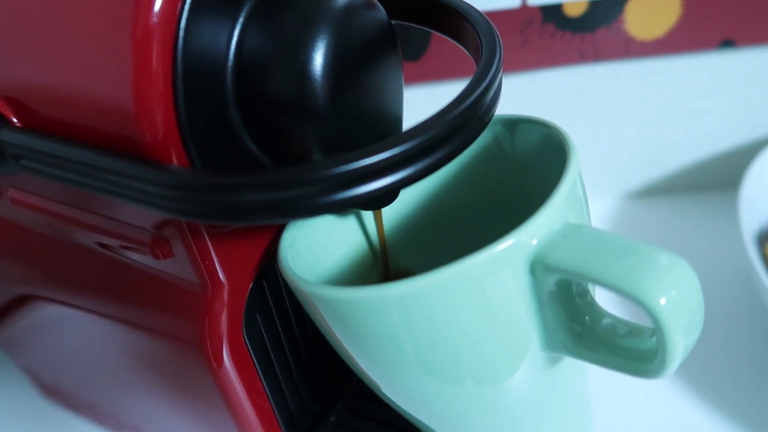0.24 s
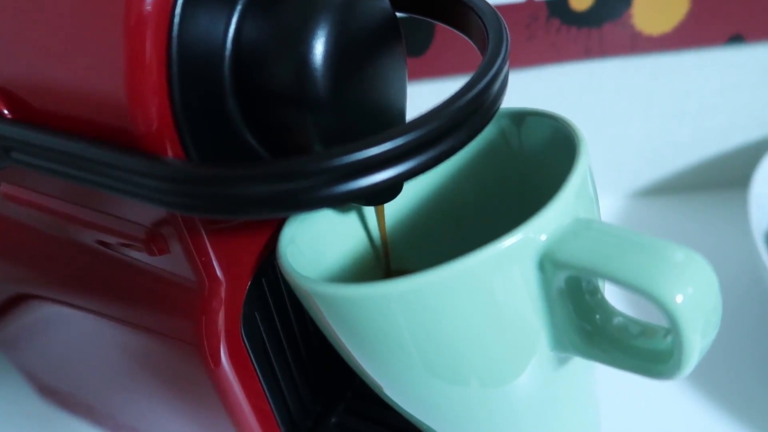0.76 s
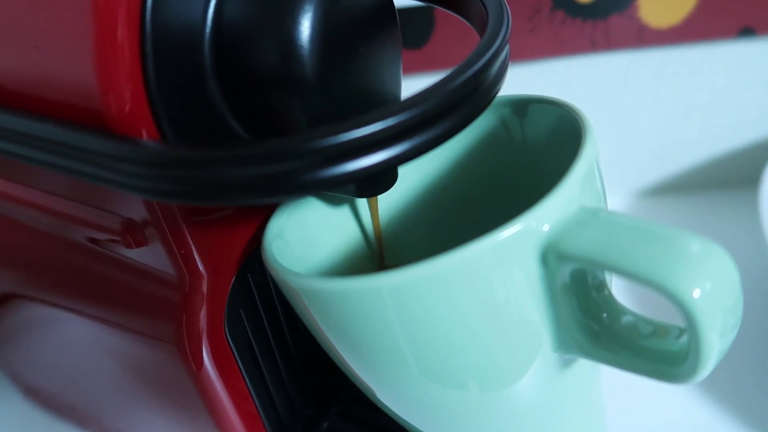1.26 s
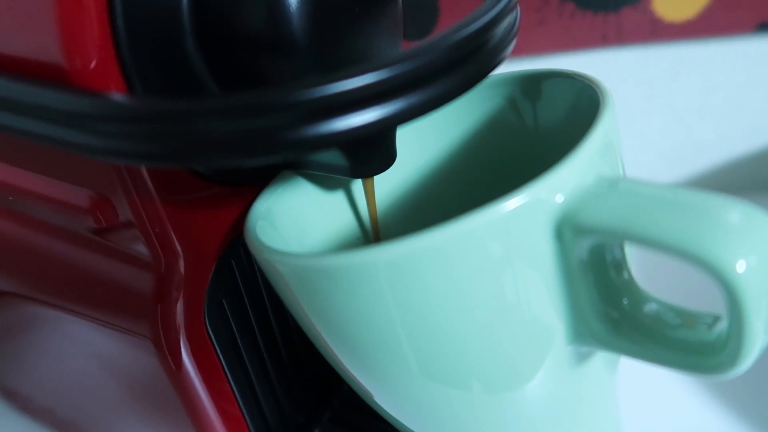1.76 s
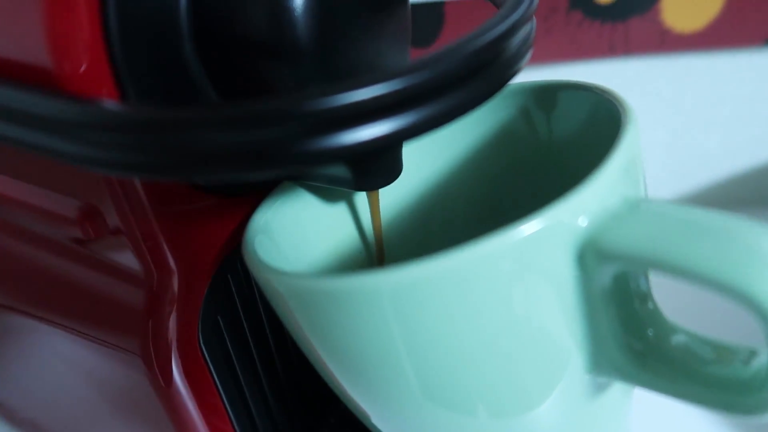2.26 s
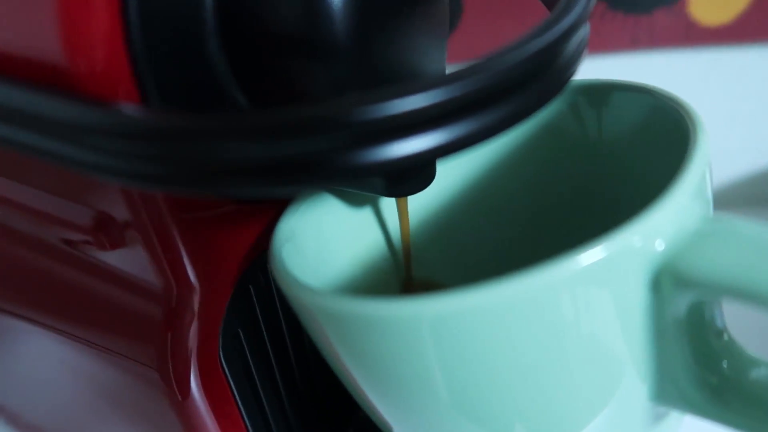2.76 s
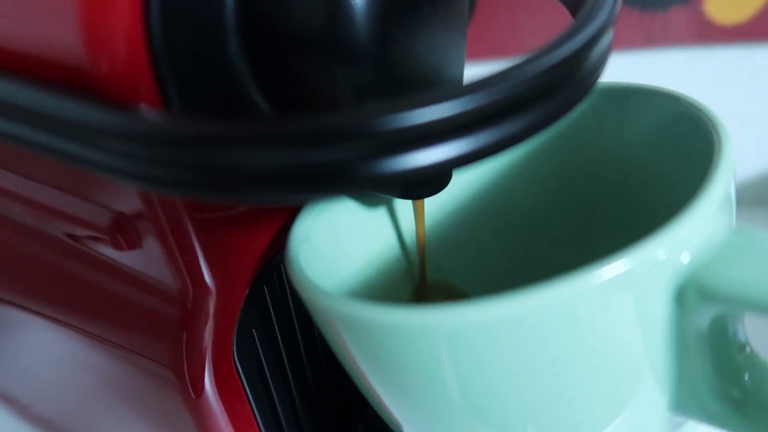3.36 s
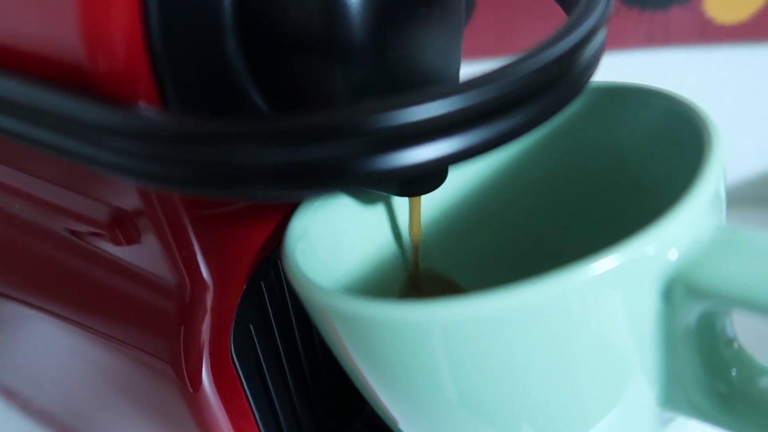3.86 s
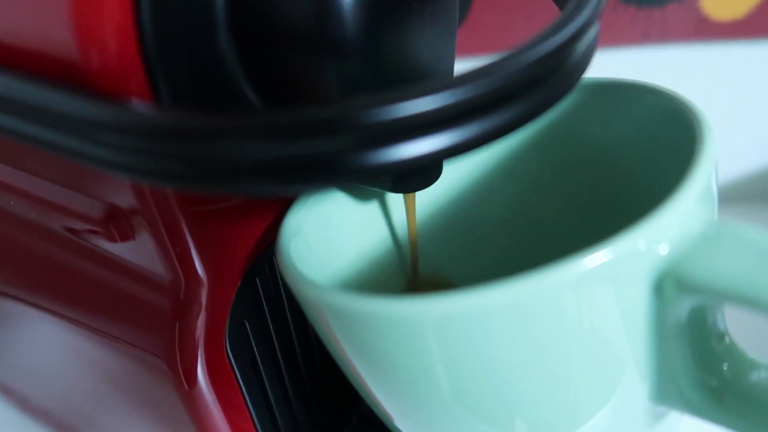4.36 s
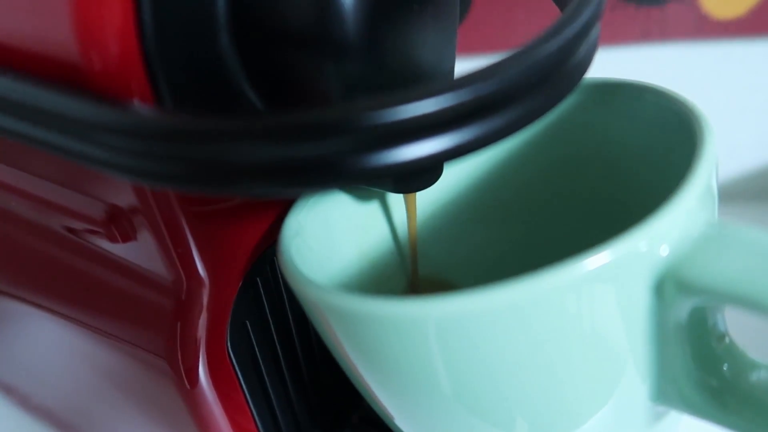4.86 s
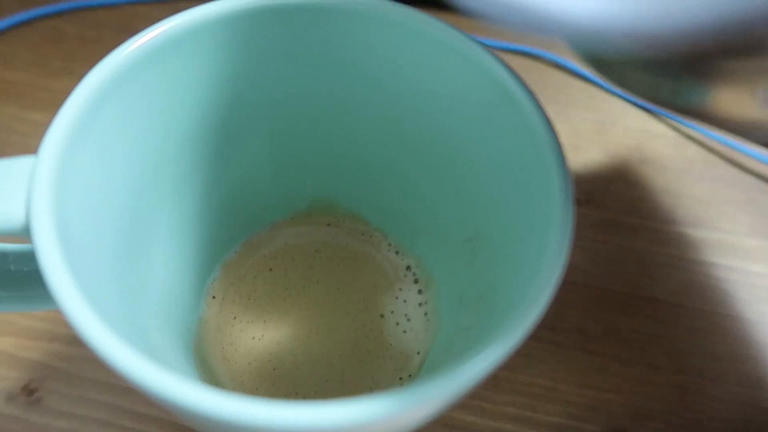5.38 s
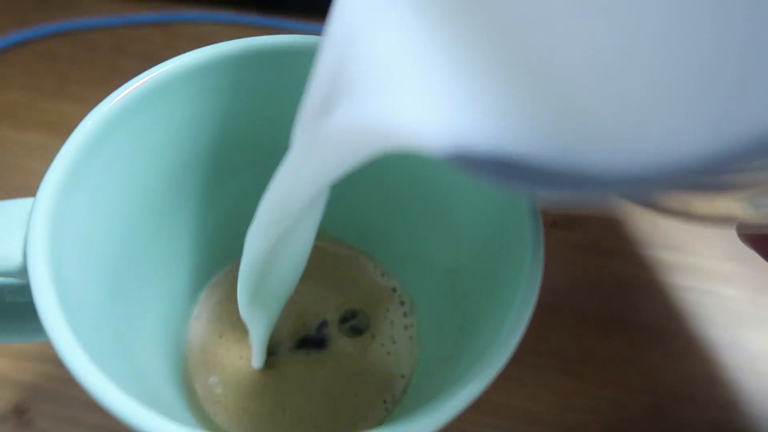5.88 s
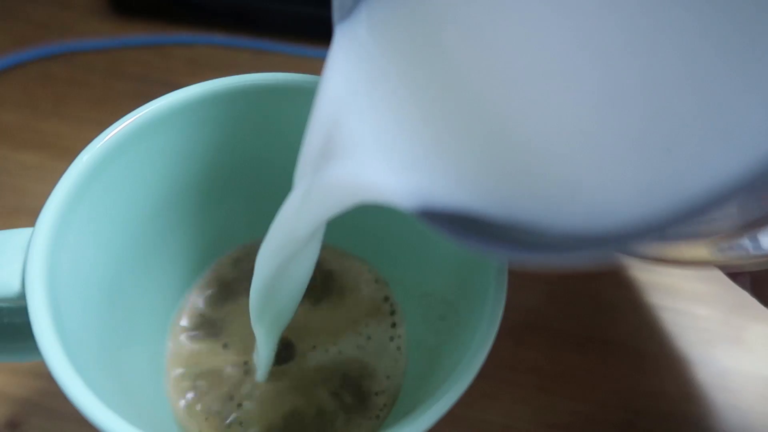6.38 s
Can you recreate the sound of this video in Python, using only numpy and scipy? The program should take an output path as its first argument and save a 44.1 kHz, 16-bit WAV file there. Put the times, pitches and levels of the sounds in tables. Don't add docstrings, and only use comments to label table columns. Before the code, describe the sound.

Close handheld stereo microphone: a steady, rough electric hum strongest around 200 hertz, with rapid piston knocking, rushing water and thin high spurts. Sputters from air pockets come early, and ceramic rattling comes and goes in short runs. Then a hard cut to much quieter milk pouring over low room rumble and a faint refrigerator drone: a sharp plop, short gurgle, light splashes and scattered bubbly blips.

```python
import sys
import numpy as np
from scipy import signal
from scipy.fft import rfft, irfft
from scipy.io import wavfile

SR = 44100
rng = np.random.default_rng(int(sys.argv[2]) if len(sys.argv) > 2 else 0)


def natural_amplitude(level_db):
    exponent = np.asarray(level_db, float) / 20
    return 10 ** exponent


def bounce(signal):
    frames = np.transpose(np.atleast_2d(signal))
    limited = np.clip(frames, -1, 1)
    pcm = np.round(limited * 32767).astype(np.int16)
    wavfile.write(sys.argv[1], SR, pcm)


N = 292383
TIME = np.arange(N) / SR
BINS_HZ = np.maximum(np.arange(N // 2 + 1) * SR / N, 1)
STROKE_HZ, CUT_S = 50.018, 5.4505

# time_s, pressure_0_to_1
PRESSURE = [
    (0, 0.04),
    (.5, 0.02),
    (1, 0.1),
    (1.5, 0.26),
    (2.4, 0.58),
    (2.9, 0.75),
    (3.3, .95),
    (4, 1),
    (5.45, 0.97),
]
# stroke_multiple, level_db
HUM_AIRY = [(1, -26), (2, -6), (3, -21), (4, 1), (5, -24), (6, -22), (7, -19.5), (8, -37.5), (9, -29),
            (10, -13.5), (11, -22.5), (12, -23), (13, -28.5), (14, -21.5), (15, -20), (16, -41), (17, -41),
            (18, -17), (19, -21), (20, -17.5), (21, -42), (22, -41), (23, -23), (24, -34), (25, -33)]
# stroke_multiple, level_db
HUM_RISING = [(1, -27.5), (2, -8.5), (3, -18.5), (4, 1), (5, -21.5), (6, -20.5), (7, -25), (8, -33),
              (9, -21.5), (10, -22), (11, -20.5), (12, -37), (13, -31), (14, -24), (15, -24), (16, -43),
              (17, -26), (18, -19), (19, -19), (20, -21.5), (21, -52), (22, -41), (23, -33), (24, -20),
              (25, -22.5)]
# stroke_multiple, level_db
HUM_FULL = [(1, -27), (2, -9.5), (3, -20.5), (4, 0.5), (5, -20), (6, -20), (7, -28), (8, -29), (9, -19),
            (10, -20), (11, -23), (12, -29.5), (13, -32.5), (14, -33), (15, -44.5), (16, -43), (17, -43),
            (18, -32), (19, -22.5), (20, -24), (21, -57), (22, -46), (23, -28.5), (24, -37), (25, -32)]
# pitch_hz, t60_s, airy_db, rising_db, full_db
HOUSING_MODES = [(1376, 0.24, -43.5, -49, -54), (1450, 0.2, -51, -52, -47), (1557, 0.067, -55, -52.5, -54),
                 (1616, 0.09, -48, -57, -58), (1696, 0.31, -43, -38, -53), (1748, 0.72, -40, -46, -44),
                 (1824, 0.077, -37.5, -42.5, -43.5), (2033, 0.26, -40, -47, -46.5),
                 (2133, 0.057, -49, -50.5, -42), (2242, 0.04, -48, -47.5, -43.5),
                 (2580, 0.099, -58, -58, -55), (2950, 0.16, -51, -53, -69)]
# frequency_hz, level_db_per_hz
RUSH_AIRY = [(25, -19), (75, -5.5), (125, 0), (170, -8), (300, -8), (400, -5), (600, -5), (950, -2),
             (1300, -6.5), (1600, -1), (2100, -4), (2500, -13.5), (4500, -25), (8000, -62)]
# frequency_hz, level_db_per_hz
RUSH_FULL = [(25, -11), (75, 1), (125, -1.5), (170, -6), (300, -8.5), (400, 1.5), (600, -2.5), (950, 0),
             (1100, -5.5), (1600, -3.5), (2200, -3.5), (2500, -9), (4500, -22.5), (8000, -41)]
# frequency_hz, level_db_per_hz
JET_SPECTRUM = [(1470, -32), (2500, 0.5), (3000, -1.5), (3320, -4), (3780, -6.5), (5670, -8.5), (6280, -17),
                (7260, -10.5), (9420, -21.5), (11200, -19.5), (12700, -20.5), (13200, -24), (14100, -37)]
# time_s, peak_db
SLAPS = [(1.326, -26), (1.366, -23), (1.5074, -19.5), (1.6458, -17), (1.6872, -30), (1.8274, -19),
         (1.9467, -24), (2.009, -33.5), (2.1063, -20), (2.1861, -26), (2.291, -25), (2.7059, -15.5),
         (2.7857, -16), (2.889, -37), (2.9286, -33), (4.0045, -17)]
RATTLE_HZ = [2970, 2850, 2930]
# start_s, length_s, level_db
LOOSE_RUNS = [(0.03, 0.3, -42), (.47, 0.31, -48), (0.921, 0.36, -40.5), (1.302, 0.25, -43.5),
              (1.72, 0.27, -42.5), (2.12, 0.25, -42), (2.45, 0.21, -39.5), (3.11, .85, -41.5),
              (3.998, 0.091, -42), (4.22, 0.39, -43), (4.737, .24, -42), (5.08, 0.18, -44.5)]
# frequency_hz, side_minus_mid_db
WIDTH_BREW = [(60, -60), (110, -51), (200, -30.5), (370, -23.5), (670, -19), (1230, -15.5), (2240, -13.5),
              (4100, -7), (7490, -1.5), (13700, 5.5)]
# time_s, level_db
CHURN = [
    (5.685, -63),
    (5.693, -38),
    (5.81, -43.5),
    (5.9, -58),
    (6.0, -60),
    (6.05, -46.5),
    (6.3, -65),
    (6.5, -50.5),
    (6.63, -58),
]
# pitch_hz, width_hz, level_db
GURGLE = [
    (345, 37, 2),
    (700, 130, -2),
]
# pitch_hz, level_db, t60_s
PLOP_RINGS = [
    (697, -10, 0.063),
    (1110, -17, 0.084),
    (350, -32, 0.14),
    (173, -33, .35),
]
# time_s, peak_db, pitch_hz
BUBBLES = [(5.633, -36, 1130), (5.701, -21, 626), (5.722, -19, 692), (5.734, -32, 710), (5.75, -33, 1090),
           (5.756, -22, 674), (5.787, -27.5, 1250), (5.816, -38, 1310), (5.837, -40, 1110),
           (5.859, -38, 700), (6.025, -37, 1110), (6.045, -33.5, 1150), (6.079, -48, 1250),
           (6.097, -46, 1080), (6.117, -34, 1230), (6.167, -48, 1240), (6.191, -39, 1180), (6.2, -36, 1110),
           (6.265, -43, 1129), (6.351, -46, 1110), (6.372, -46, 1110), (6.393, -34, 1070),
           (6.442, -42, 1110), (6.47, -31, 1110), (6.484, -37, 1100), (6.501, -35, 1100),
           (6.511, -38, 1100), (6.534, -25.5, 1110), (6.546, -34, 1140), (6.614, -45, 945)]
# time_s, peak_db, centre_hz
SNAPS = [
    (5.633, -57, 9000),
    (5.656, -62, 9000),
    (5.734, -45, 2700),
    (5.783, -52, 8000),
    (5.793, -46, 2900),
    (5.838, -49, 2600),
    (6.191, -48, 2950),
    (6.265, -54, 3100),
    (6.534, -51, 5000),
]
# pitch_hz, level_db, t60_s
DROP_RINGS = [
    (720, -3.5, 0.028),
    (1080, 0.5, .03),
    (1144, -1.5, 0.035),
    (1280, -2.5, 0.02),
    (1450, -4.5, 0.015),
    (2000, -7, 0.013),
    (2600, -8, 0.017),
    (3050, -6.5, 0.013),
    (3300, -6, .01),
]
# frequency_hz, level_db_per_hz
KITCHEN_SPECTRUM = [(15, -37), (25, -9), (54, -7), (92, -24), (129, -5.5), (214, -13.5), (245, -11),
                    (294, -19), (1880, -33), (2100, -33.5), (2590, -39), (3760, -38.5), (14100, -54.5)]
# frequency_hz, side_minus_mid_db
WIDTH_POUR = [(60, -20), (110, -25), (200, -12), (370, -6.5), (670, -10.5), (1230, -13.5), (2240, -3),
              (4100, -3), (7490, 0), (13700, 2)]


def rms_one(x):
    return x / np.sqrt(np.mean(x ** 2) + 1e-20)


def curve(rows):
    time_s, value = np.transpose(rows)
    return np.interp(TIME, time_s, value)


def by_pressure(levels, pressure):
    return np.interp(pressure[::64], [0, .5, 1], levels).repeat(64)[:N]


def coloured(x, spectrum):
    hz, db = np.transpose(spectrum)
    return irfft(rfft(x) * natural_amplitude(np.interp(np.log(BINS_HZ), np.log(hz), db)), N)


def bandpass(x, order, low_hz, high_hz):
    return signal.sosfilt(signal.butter(order, [low_hz, high_hz], "band", fs=SR, output="sos"), x)


def drift(rate_hz):
    return 1.22 * np.interp(TIME, np.arange(600) / (2 * rate_hz), rng.standard_normal(600))


def ring(clicks, hz, t60_s):
    r, w = natural_amplitude(-60 / (t60_s * SR)), 2 * np.pi * hz / SR
    return signal.lfilter([0, np.sin(w)], [1, -2 * r * np.cos(w), r * r], clicks + 1e-18)


def narrow_noise(hz, width_hz):
    lowpass = signal.butter(2, width_hz / 2, fs=SR / 16, output="sos")
    re, im = signal.sosfilt(lowpass, rng.standard_normal((2, N // 16 + 2)))
    slow = np.interp(np.arange(N) / 16, np.arange(N // 16 + 2), re + 1j * im)
    carrier = np.exp(2j * np.pi * np.cumsum(hz + 0 * TIME) / SR)
    return rms_one(np.real(slow * carrier))


def clicks_at(seconds, sizes):
    out = np.full(N, 1e-18)
    np.add.at(out, np.clip((np.asarray(seconds) * SR).astype(int), 0, N - 1), sizes)
    return out


def scattered(x, decay_s):
    t = np.arange(int(5 * decay_s * SR)) / SR
    echoes = rms_one(rng.standard_normal(len(t)) * np.exp(-t / decay_s)) / np.sqrt(len(t))
    return signal.oaconvolve(x, echoes)[:N]


def stroke_times(phase):
    return (np.arange(int(CUT_S * STROKE_HZ) + 1) + phase) / STROKE_HZ


def hum(level_db, pressure, rush_db):
    out = natural_amplitude(-50.5) * np.cos(2 * np.pi * 49.32 * TIME - 1.6)
    strongest_db = dict(HUM_FULL)[4]
    for (k, airy_db), (_, rising_db), (_, full_db) in zip(HUM_AIRY, HUM_RISING, HUM_FULL):
        high = k > 4
        db = level_db + 3 + by_pressure([airy_db, rising_db, full_db], pressure) - strongest_db
        db = db + (0.26 * high + 0.076 * k) * drift(5.0)
        db = db + .5 * (rush_db + 30.5) * high
        lag = (rng.uniform(0, 2 * np.pi) + .7 * k * k) * high + 0.011 * k * drift(7.0)
        out += natural_amplitude(db[::16]).repeat(16)[:N] * np.cos(2 * np.pi * k * STROKE_HZ * TIME + lag)
    return out


def knocks(pressure):
    first, second = stroke_times(0.13245), stroke_times(.33)
    chance = rng.standard_normal((len(first), len(HOUSING_MODES) + 2))
    flip_chance, force_chance = chance[:, -2], chance[:, -1]
    out = 0
    for k, (hz, t60_s, *levels_db) in enumerate(HOUSING_MODES):
        blows = clicks_at(first, 0.5 * natural_amplitude(1.7 * force_chance))
        blows = blows - clicks_at(second + .0061, 0.6) + clicks_at(second, natural_amplitude(0.81 * chance[:, k]))
        level_db = by_pressure(levels_db, pressure) + 0.9 * drift(2.5)
        out = out + natural_amplitude(level_db) * rms_one(ring(blows, hz, t60_s))
    turns = np.cumprod(np.where(flip_chance > 1.7, 1, -1))
    panel = rms_one(ring(clicks_at(second, turns * natural_amplitude(2.5 * force_chance)), 1575, .09))
    panel_db = -37.5 - 28 * pressure + 6.0 * np.exp(-TIME / .4) + 1.6 * drift(15.0)
    return out + natural_amplitude(panel_db) * panel


def stroke_bursts(at, shape):
    return signal.oaconvolve(clicks_at(at, natural_amplitude(2.7 * rng.standard_normal(len(at)))), shape)[:N]


def water(pressure, rush_db, spurt_db):
    at = stroke_times(0.26)
    t = np.arange(int(.03 * SR)) / SR
    shape = (1 - np.exp(-t / 0.00068)) * np.exp(-t / 0.018)
    rush_bursts, jet_bursts = stroke_bursts(at, shape), stroke_bursts(at, shape)
    airy = rms_one(coloured(rng.standard_normal(N), RUSH_AIRY))
    full = rms_one(coloured(rng.standard_normal(N), RUSH_FULL))
    flow = np.sqrt(1 - pressure) * airy + np.sqrt(pressure) * full
    rush = natural_amplitude(rush_db - 6) * (.9 + .45 * rush_bursts) * flow
    jet = rms_one(coloured(rng.standard_normal(N), JET_SPECTRUM))
    spurt = natural_amplitude(spurt_db + 1) * rms_one(0.23 + jet_bursts) * jet
    slap_s, slap_db = np.transpose(SLAPS)
    slaps = signal.fftconvolve(clicks_at(slap_s, natural_amplitude(slap_db - 17.0)), np.exp(-t / 0.0092))[:N]
    slaps = bandpass(slaps * jet, 2, 3200, 9500)
    whistle = natural_amplitude(spurt_db - 27 + 5.0 * drift(9.0)) * narrow_noise(11120, 120)
    return rush + spurt + slaps + whistle


def looseness_db():
    settled_db, edge_s = -49, 0.036
    coarse, out = TIME[::64], settled_db
    for start_s, length_s, db in LOOSE_RUNS:
        from_edge_s = np.minimum(coarse - start_s, start_s + length_s - coarse)
        inside = np.clip(from_edge_s / edge_s + .5, 0, 1)
        out = np.maximum(out, settled_db + (db - settled_db) * inside)
    return out.repeat(64)[:N]


def rattle(hz, level_db):
    t = np.arange(int(.03 * SR)) / SR
    at = np.append(stroke_times(.4), stroke_times(.9))
    shared_db = 2.5 * np.minimum(rng.exponential(1, len(at)), 2.4)
    shared_db = shared_db - 7 * (np.arange(len(at)) >= len(at) // 2)
    tick = t / 0.0018 * np.exp(-t / 0.0018)
    out = 0
    for ratio, db in ((1, 0.0), (.9, -8), (1.16, -10)):
        sizes = natural_amplitude(shared_db + 1.8 * rng.standard_normal(len(at)))
        gate = signal.oaconvolve(clicks_at(at, sizes), tick)[:N]
        out = out + natural_amplitude(db) * rms_one(0.06 + gate) * narrow_noise(hz * ratio + 30 * drift(25.0), 60)
    return natural_amplitude(level_db - 2.0) * out


def brew():
    pressure = np.clip(curve(PRESSURE), 0, 1)
    surge = np.exp(-TIME / 0.32)
    hum_db = -21 + 2 * pressure + 1.5 * surge
    rush_db = -30 - 0.8 * pressure + 3.5 * surge
    spurt_db = -43 - 1.65 * TIME + 7 * surge
    rattle_hz = by_pressure(RATTLE_HZ, pressure) + 300 * np.clip(TIME - 3.75, 0, .4)
    pump = hum(hum_db, pressure, rush_db) + knocks(pressure)
    return pump + water(pressure, rush_db, spurt_db) + rattle(rattle_hz, looseness_db())


def kitchen():
    rumble = natural_amplitude(-47 + .4 * drift(3.2)) * rms_one(coloured(rng.standard_normal(N), KITCHEN_SPECTRUM))
    return rumble + natural_amplitude(-53 + 2.7 * drift(3.6)) * narrow_noise(158, 25)


def gurgle(plop_s):
    steady_db, burst_db, hold_s, fade_db_per_s = -57, -35.5, .04, 114
    fading_db = burst_db - fade_db_per_s * np.maximum(TIME - plop_s - hold_s, 0)
    level_db = np.where(TIME > plop_s, np.maximum(fading_db, steady_db), steady_db)
    bands = sum(natural_amplitude(db + 2.2 * drift(25.0)) * narrow_noise(hz, width_hz) for hz, width_hz, db in GURGLE)
    return natural_amplitude(level_db - 3.5) * bands


def cup_air(churn_db):
    air_db = -65 + 0.94 * (churn_db + 49)
    return natural_amplitude(air_db + 3.9 * drift(40.0)) * narrow_noise(1140, 240)


def plop(plop_s):
    blow = clicks_at([plop_s], natural_amplitude(-9))
    t = np.arange(int(.01 * SR)) / SR
    swell = np.exp(-((t - .00095) / 0.0013) ** 2)
    cavity = -natural_amplitude(0.5) * swell * np.sin(2 * np.pi * 900 * t)
    tick = natural_amplitude(-2.0) * signal.lfilter([.4], [1, -1.3, .45], blow)
    soft = signal.lfilter([.08], [1, -.92], blow)
    after_ring = natural_amplitude(3.5) * sum(natural_amplitude(db) * ring(soft, hz, t60_s) for hz, db, t60_s in PLOP_RINGS)
    return tick + signal.fftconvolve(blow, cavity)[:N] - after_ring + natural_amplitude(-6) * scattered(tick, 0.013)


def bubbles():
    out, t = np.zeros(N), np.arange(int(.08 * SR)) / SR
    for (s, db, hz), noise in zip(BUBBLES, rng.standard_normal((len(BUBBLES), len(t)))):
        tone = natural_amplitude(db + 1.0 - 60 * t / .024) * (1 - np.exp(-t / 0.00058))
        tone = tone * np.sin(2 * np.pi * hz * t * (1 + 5.1 * t))
        air = natural_amplitude(db - 2 - 60 * t / 0.013) * (1 - np.exp(-t / 0.00091))
        air = air * np.sin(2 * np.pi * (1150 + 120 * noise[0]) * t)
        crack_db = -51.5 + .55 * (db + 36) - (10 if hz < 800 else 0)
        crack = natural_amplitude(crack_db + 13) * bandpass(noise * np.exp(-t / .003), 2, 2500, 3500)
        at = int(s * SR)
        out[at:at + len(t)] += (tone + air + crack)[:N - at]
    return out + natural_amplitude(-9) * scattered(out, .01)


def snaps():
    out, t = np.zeros(N), np.arange(int(.03 * SR)) / SR
    for (s, db, hz), noise in zip(SNAPS, rng.standard_normal((len(SNAPS), len(t)))):
        burst = bandpass(noise * t * np.exp(-t / 0.0019), 4, hz / 1.27, hz * 1.27)
        at = int(s * SR)
        out[at:at + len(t)] += natural_amplitude(db - 10.5) * rms_one(burst)
    return out


def splatter(level_db):
    drops_per_s = 450
    sizes = natural_amplitude(3.5 * np.minimum(rng.exponential(1, N), 2.5)) * rng.choice([-1, 1], N)
    sizes = sizes * (rng.random(N) < drops_per_s / SR)
    dealt = rng.integers(0, len(DROP_RINGS), N)
    rings = sum(natural_amplitude(db) * ring(sizes * (dealt == k), hz, t60_s)
                for k, (hz, db, t60_s) in enumerate(DROP_RINGS))
    return natural_amplitude(level_db) * rms_one(signal.lfilter([.3], [1, -.7], rings))


def pour():
    plop_s, churn_db = 5.6903, curve(CHURN)
    stream = gurgle(plop_s) + cup_air(churn_db) + plop(plop_s)
    return stream + bubbles() + snaps() + splatter(churn_db)


def two_ports(mid, width, decay_s):
    sway = 1.28 * drift(2.5)
    side = np.cos(sway) * scattered(mid, decay_s) + np.sin(sway) * scattered(mid, decay_s)
    side = coloured(side, width) + coloured(mid, [(300, -58), (1200, -22.5), (8000, -28)])
    return np.array([mid + side, mid - side])


def scene():
    hiss_end = signal.butter(8, 13400, fs=SR, output="sos")
    brewing = signal.sosfilt(hiss_end, two_ports(brew(), WIDTH_BREW, .025))
    pouring = two_ports(pour() + kitchen(), WIDTH_POUR, 0.012)
    return np.where(TIME < CUT_S, brewing, pouring)


def band_limit(x):
    return signal.sosfilt(signal.butter(12, 14290, fs=SR, output="sos"), x)


def record(dry):
    return band_limit(dry)


dry = scene()
out = record(dry)
bounce(out)
```